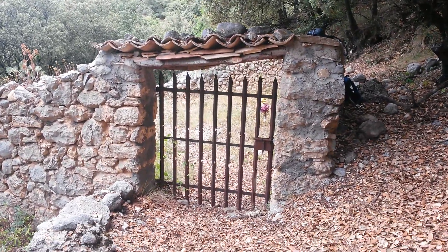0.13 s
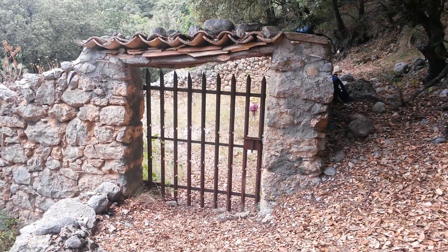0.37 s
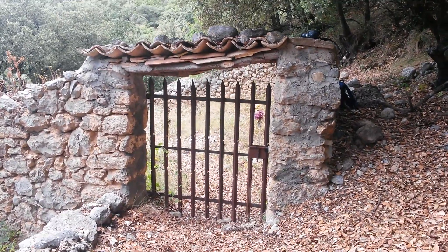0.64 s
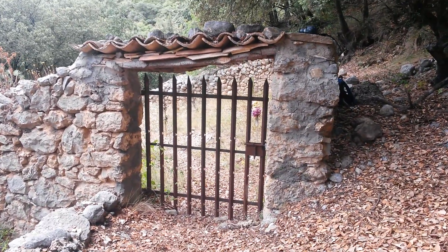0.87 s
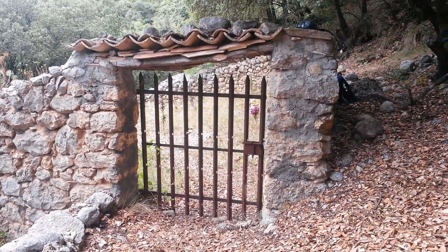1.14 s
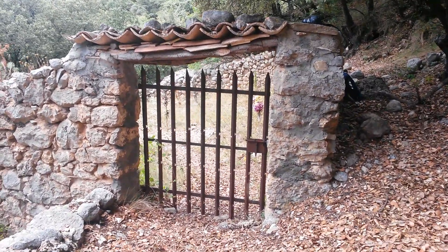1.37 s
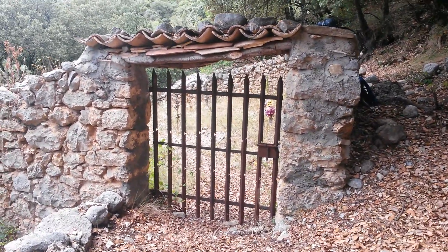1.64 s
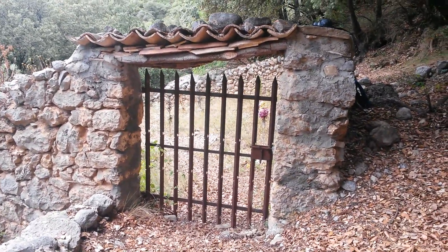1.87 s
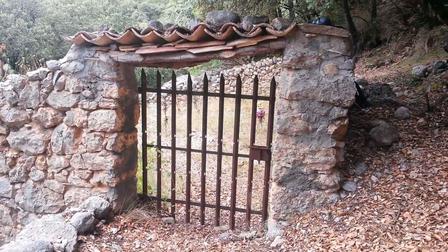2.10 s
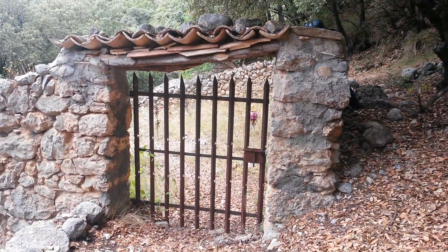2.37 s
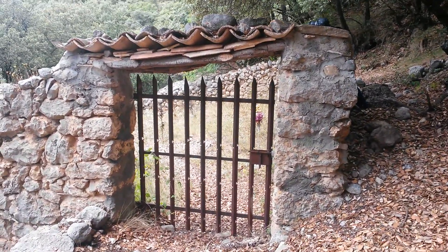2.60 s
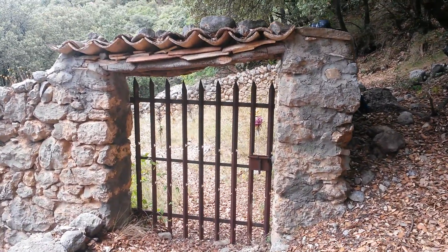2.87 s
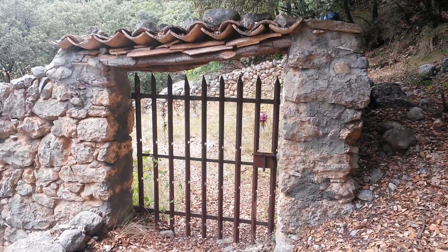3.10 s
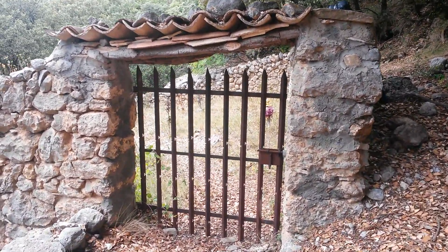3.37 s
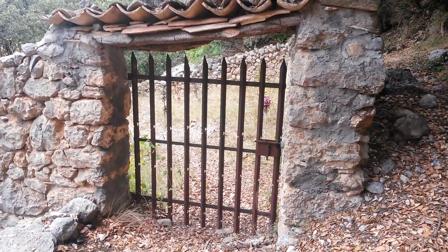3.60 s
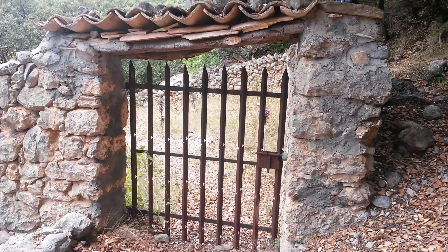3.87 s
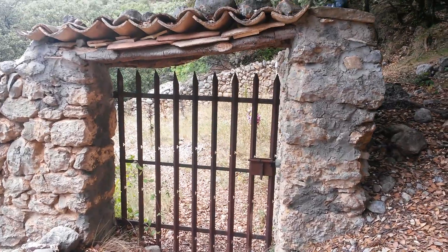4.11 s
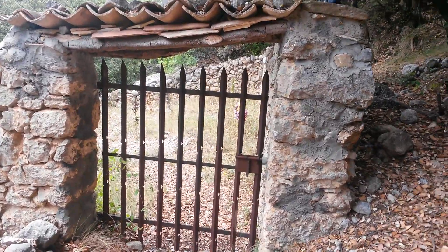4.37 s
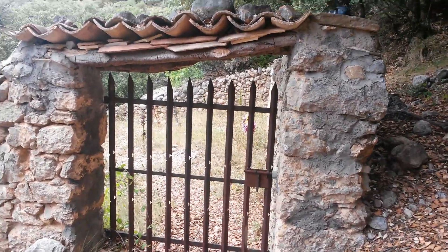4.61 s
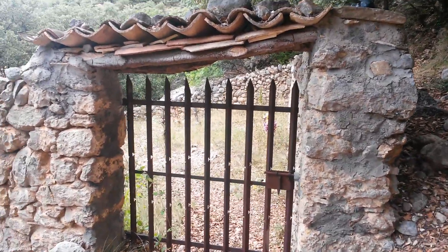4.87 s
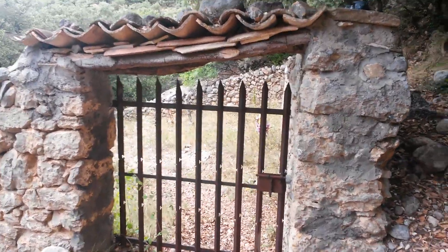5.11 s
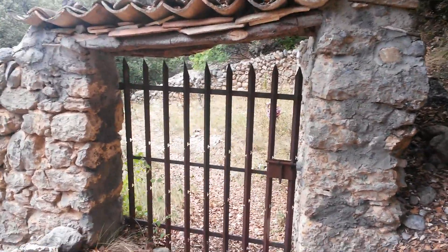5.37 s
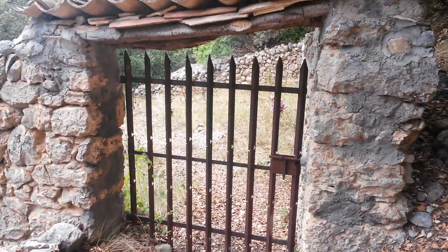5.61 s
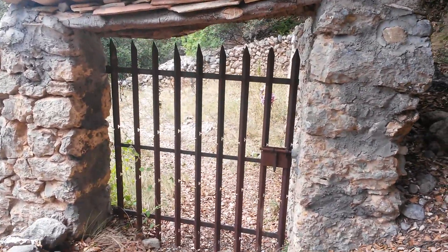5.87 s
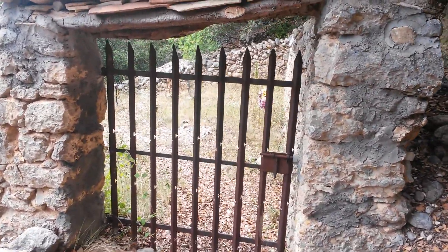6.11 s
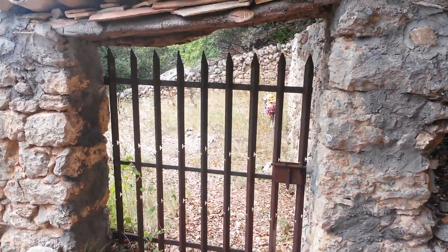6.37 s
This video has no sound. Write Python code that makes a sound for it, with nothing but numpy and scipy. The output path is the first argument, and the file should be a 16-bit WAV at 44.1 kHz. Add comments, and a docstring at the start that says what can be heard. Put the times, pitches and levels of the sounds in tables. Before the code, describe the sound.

Someone wades unhurriedly through brittle fallen leaves, each step a burst of sharp crackling, while the hand-held microphone pops and rumbles softly.

```python
"""Outdoors among trees, slow steps push through deep dry leaves, heard by a hand-held two-port camera.
Leaves snap in thousands of tiny noise ticks, some loud; each port adds its own treble colour.
Twigs and pebbles knock dully under the sole as short swings of a cycle or two.
The gripping hand makes the case pop and rumble, mostly at the left port.
A steady hush of filtered noise lies beneath."""
import sys
import numpy as np
from scipy import signal
from scipy.fft import rfft, irfft, next_fast_len
from scipy.io import wavfile
from scipy.ndimage import uniform_filter1d

SR = 44100
rng = np.random.default_rng(int(sys.argv[2]) if len(sys.argv) > 2 else 0)


def magnitude_from_level(level_db):
    """Linear magnitude for a level in decibels (20 dB per decade)."""
    exponent = np.asarray(level_db, float) / 20
    return 10 ** exponent


def generate_wav(signal):
    """Clip the signal to [-1, 1] and save it as 16-bit WAV at the path in sys.argv[1]."""
    frames = np.transpose(np.atleast_2d(signal))
    scaled = np.clip(frames, -1, 1) * 32767
    pcm = np.round(scaled).astype(np.int16)
    wavfile.write(sys.argv[1], SR, pcm)


N = 285944
T = np.arange(N) / SR

# colour of the quiet outdoor air: pitch_hz, level_db (relative)
HUSH_COLOUR = [(30, -17), (100, -13), (300, 3), (800, -2), (1500, 0.5), (2100, -3), (3000, -4), (4000, -8),
               (7700, 4.5), (10500, -7), (14400, -8), (14900, -33), (15600, -40)]
# level of the low rumble as heard, nearly gone near 4.0 s, before flicker and port levels: time_s, level_db
RUMBLE = [(0.0, -28), (0.05, -40), (0.09, -35.5), (0.16, -34), (0.22, -53), (0.4, -40), (0.75, -34),
          (1.12, -35), (1.6, -42), (2.05, -33), (2.35, -40.5), (2.6, -45), (2.67, -48), (2.95, -44),
          (3.16, -49), (3.3, -40.5), (3.47, -52), (3.6, -45), (3.76, -39), (3.85, -52), (4.0, -88),
          (4.13, -40.5), (4.28, -43), (4.45, -39.5), (5.2, -41), (5.5, -45.5), (5.65, -40), (5.76, -41),
          (5.9, -44), (6.1, -38), (6.25, -39), (6.48, -40)]
# level of the deeper rumble as heard, likewise: time_s, level_db
DEEP_RUMBLE = [(0.0, -42), (0.25, -51), (0.7, -46), (1.15, -35.5), (1.6, -43), (2.05, -40), (2.4, -47),
               (2.9, -44), (3.2, -50), (3.7, -47), (3.98, -80), (4.15, -37.5), (4.6, -39), (5.2, -32),
               (5.6, -41), (5.9, -45), (6.2, -38), (6.48, -43)]
# case slipping under the fingers: time_s, level_db (before filtering), pitch_hz (it swings at 0.79 of this)
CASE_POPS = [(0.038, -33, 360), (0.1319, -34, 323), (0.1428, -29.5, 333), (0.432, -25, 610),
             (0.4653, -26, 430), (0.67, -40, 300), (0.79, -33, 300), (0.89, -25, 300), (0.9693, -29, 219),
             (1.007, -28, 234), (1.103, -24.5, 260), (1.1616, -25.5, 279), (1.204, -28, 234),
             (1.228, -28, 192), (1.2492, -25.5, 240), (1.3946, -32, 304), (1.4668, -31.5, 305),
             (1.6743, -31.5, 325), (1.7912, -30.5, 203), (1.8729, -28, 214), (1.886, -26, 200),
             (2.149, -27, 337), (2.3006, -23, 324), (2.5642, -21, 300), (2.5805, -32, 230),
             (2.6373, -14.5, 154), (3.7594, -21, 880), (3.91, -35, 300), (4.1428, -22.5, 313),
             (4.386, -31, 210), (4.4098, -21, 328), (4.5114, -10, 364), (4.527, -23, 354),
             (4.681, -22.5, 314), (4.8138, -24.5, 507), (4.9273, -27.5, 515), (5.0872, -21.5, 440),
             (5.1393, -23, 415), (5.161, -27, 317), (5.2855, -17.5, 344), (6.0052, -27.5, 296),
             (6.12, -36, 300)]
# twigs and pebbles giving way under the sole: peak_s, level_db (right port), pitch_hz
CLEAR_KNOCKS = [(0.039, -37.5, 694), (0.131, -37, 700), (0.145, -45, 680), (0.4057, -32, 1600),
                (0.6848, -33, 790), (0.7142, -33, 694), (0.7392, -30, 820), (0.8053, -24, 1510),
                (0.9178, -34, 765), (1.0859, -24.5, 760), (1.143, -37, 865), (1.1546, -33, 760),
                (1.343, -31.5, 960), (1.4226, -35, 925), (2.0221, -33, 725), (2.0326, -30.5, 720),
                (2.194, -35, 845), (3.047, -29, 990), (3.139, -27, 1100), (3.162, -25.5, 570),
                (3.17, -31, 900), (3.1762, -29, 940), (3.312, -30, 1020), (3.4082, -29.5, 1100),
                (3.916, -32, 794), (4.006, -36, 1130), (4.4677, -35.5, 730), (4.802, -35, 895),
                (4.964, -32, 960), (5.0516, -33, 820), (5.058, -31, 776), (5.248, -35.5, 730),
                (5.397, -35, 1210), (5.471, -42, 900), (5.568, -43, 630), (5.5955, -33, 820),
                (5.611, -43, 500), (5.702, -31.5, 1330), (5.705, -37, 1120), (5.722, -31, 1070),
                (5.748, -34, 1130), (5.774, -37, 1200), (5.815, -33, 1110), (5.9086, -33.5, 1140),
                (5.9362, -26, 1360), (6.125, -32.5, 980), (6.3421, -24, 1010), (6.3494, -37, 900),
                (6.3567, -31, 724), (6.362, -33, 905), (6.3657, -30, 694), (6.372, -31, 900),
                (6.375, -35, 800), (6.384, -34, 1100), (6.4146, -24, 1260)]
# leaves under the feet, one list a step: time_s, crackle_db
TREAD = [
    [(0.0, -50.5), (0.12, -50.5), (0.2, -54.5), (0.3, -69), (0.37, -50)],
    [(0.39, -42.5), (0.45, -35), (0.54, -43.5), (0.61, -42), (0.65, -37.5), (0.72, -36), (0.83, -44),
     (0.9, -35), (1.0, -40), (1.06, -35.5), (1.12, -37), (1.15, -38), (1.19, -36.5), (1.25, -43),
     (1.3, -37), (1.52, -38), (1.63, -39.5), (1.68, -41), (1.72, -47), (1.78, -46)],
    [(1.83, -51), (1.9, -33), (2.05, -34), (2.14, -33.5), (2.24, -34), (2.29, -39.5), (2.33, -41.5),
     (2.45, -47.5), (2.6, -46.5), (2.84, -47.5), (2.89, -41.5)],
    [(2.92, -37.5), (2.96, -31.5), (3.03, -40), (3.075, -31), (3.095, -30), (3.135, -27), (3.19, -31.5),
     (3.22, -34.5), (3.255, -29.5), (3.34, -30.5), (3.47, -42), (3.58, -53), (3.65, -48.5), (3.72, -54.5)],
    [(3.75, -33.5), (3.77, -26), (3.81, -26), (3.93, -24.5), (4.03, -31), (4.12, -31.5), (4.15, -38),
     (4.175, -44), (4.19, -37), (4.27, -39), (4.36, -46), (4.41, -51.5), (4.47, -40.5), (4.5, -40)],
    [(4.512, -42), (4.53, -30.5), (4.575, -35), (4.61, -32.5), (4.635, -34), (4.7, -35.5), (4.74, -34),
     (4.8, -40.5), (4.84, -31), (4.885, -44.5), (4.9, -42.5), (4.97, -39.5), (5.22, -33), (5.28, -35.5),
     (5.4, -39), (5.52, -47.5)],
    [(5.58, -51.5), (5.67, -43.5), (5.705, -49), (5.735, -36), (5.79, -44), (5.825, -39.5), (5.86, -43),
     (6.0, -40), (6.2, -35), (6.225, -36), (6.24, -41), (6.26, -35), (6.3, -39), (6.37, -31),
     (6.405, -36.5), (6.425, -35.5), (6.48, -33.5)],
]
# one row a step: left_minus_right_db, treble_tilt_db, top_over_treble_db, rustle_db, low_crunch_db
# (the last two hold at a crackle of -40 dB; leaf_bed() varies the others and the rustle)
STEP_TRAITS = [(1.5, -3, 1, -26, -53), (0, 1, 0.5, -20.5, -50), (1, 1.5, 1.5, -19, -50.5),
               (-1, 0.5, -0.5, -19, -53), (1, 4, -1, -20, -57.5), (2, -1, 2, -20.5, -52),
               (2, 0, 3, -19.5, -50.5)]
# slow swelling and thinning of the rustle: time_s, level_db
RUSTLE_SWELL = [(0.0, 2), (0.8, -2.5), (1.2, 0), (1.6, 0.5), (2.3, 0.5), (2.45, 4.5), (2.8, 2), (3.4, -1),
                (3.6, 6), (3.78, -1), (4.1, 2), (4.4, 2.5), (4.52, 0.5), (5.0, 2), (5.35, -0.5), (5.5, 0),
                (5.69, -2), (5.76, -0.5), (6.48, 3.5)]
# loud snaps, before the offsets in loud_snaps():
# peak_s, level_db, body_over_level_db, treble_over_middle_db, left_minus_right_db
LOUD_SNAPS = [(0.1315, -29, -15, -6, 21), (0.185, -33, -27, -15, 6), (0.26, -25, -20, -9.5, 9),
              (0.2833, -40, -22, 3, 0), (0.399, -23, -27, 3, -2), (0.4024, -15, -23, -9, 0),
              (0.4089, -17, -18, -12, 5), (0.4445, -15, -20, -6, 3), (0.45, -23, -21, -13, 9),
              (0.456, -20, -16, -8, 4), (0.4599, -11, -19, -1, 5), (0.4641, -24, -20, 2, 0),
              (0.4902, -7.5, -25, -7.5, 9), (0.515, -23, -27, -10, 7), (0.528, -25, -20, 9, 7),
              (0.579, -20, -25, -5, 6), (0.5889, -19, -26, 0, 6), (0.5923, -24, -28, -9, 10),
              (0.6007, -19, -15, 6, 4), (0.605, -15.5, -23, -12, 6), (0.6095, -21, -20, 10, -4),
              (0.6228, -23, -10.5, 5, 7), (0.6325, -28, -23, 4, -6), (0.653, -42, -16, -13, 0),
              (0.6593, -21.5, -29, -14, 7), (0.667, -18, -23, -10, 4), (0.684, -27, -21, 10, 7),
              (0.6902, -16, -19, 5, 4), (0.6964, -19, -19, 6, 4), (0.719, -20, -15, 6, 4),
              (0.7363, -16, -24, 8, 5), (0.7396, -14.5, -16.5, 0, 12), (0.7483, -15, -14.5, 3, 3),
              (0.7753, -14.5, -21, 1, 1), (0.7927, -17, -19, -2, -1), (0.806, -14.5, -15.5, -9, 10),
              (0.8143, -21, -25, 5, 5), (0.827, -20, -26, 1, 0), (0.855, -26, -31, 10, 7),
              (0.877, -19, -15, 0, 4), (0.8854, -22, -14.5, -8, 3), (0.9057, -18, -14, 1, 7),
              (0.919, -15.5, -20, 6, 1), (0.9243, -26, -25, 5, 8), (0.953, -27, -27, 9, 3),
              (0.9682, -23.5, -27, 11, 3.5), (0.9803, -25, -20, 8, 2), (0.9867, -25, -30, 11, 8),
              (0.9958, -24, -25, 5, 0), (1.0094, -27, -29, -19, 8), (1.0137, -25, -35, -23, 12),
              (1.0335, -25, -33, 8, 4), (1.044, -17, -17, 2, 9), (1.0489, -10.5, -18, 6, -4),
              (1.072, -21, -20, 8, 4), (1.0782, -28, -23, 0, 3), (1.082, -13, -19, 6, 2),
              (1.1416, -26, -28, 5, 8), (1.148, -16, -29, -1, 8), (1.1538, -15.5, -7.5, 5, -9),
              (1.1653, -10, -23, -1, 6), (1.1805, -21, -12, 6, -1), (1.2074, -26, -24, 6, -4),
              (1.212, -26, -12, 1, -3), (1.22, -25, -17, 2, -4), (1.2293, -26, -28, 7, -6),
              (1.2385, -30, -26, 5, -5), (1.2764, -36, -27, 5, -6), (1.294, -28, -18, -1, 0),
              (1.298, -29, -28, -4, 1), (1.31, -35, -23, 1, -2), (1.343, -28, -15, 3, -3),
              (1.3725, -15, -27, 6, -2), (1.3933, -12, -29, -2, 6), (1.4128, -12, -20, -1, 0),
              (1.485, -19, -15, 1, -3), (1.5116, -17, -25, 12, 6), (1.514, -15, -28, -2, -7),
              (1.676, -23, -17, -9, -4), (1.7557, -22.5, -13, -1, 10), (1.7743, -21.5, -24, 8, 4),
              (1.8216, -19.5, -24, -2, 3), (1.8358, -18, -20, 4, 1), (1.8403, -26, -23, -9, -5),
              (1.8564, -12, -18, 0, 1), (1.8804, -29, -31, 7, -9), (1.906, -31, -28, 4, -7),
              (1.917, -15.5, -26, 7, 3), (1.9207, -12, -18, 3, 3), (1.9235, -13, -15, -2, 5),
              (1.9417, -15, -15, 4, 3), (1.9626, -18, -26, 6, -1), (1.966, -14, -18, 1.5, 12),
              (1.974, -16, -15, -3, 2), (1.9881, -19.5, -23, 10, 7), (2.0103, -18, -30, 14, 5),
              (2.019, -24, -23, 6, 1), (2.034, -13, -14, -11, 5), (2.043, -8.5, -17, 1, 5),
              (2.0523, -13, -23, 4, 3), (2.0727, -19, -23, -9, 14), (2.094, -22, -25, 6, -6),
              (2.114, -25, -20, 5, 1), (2.135, -15.5, -32, -13, 1), (2.138, -18.5, -24, 9, 7),
              (2.171, -17, -20, 6, 0), (2.175, -15, -19, 2, 9), (2.212, -16, -12, -1, 6),
              (2.2212, -18, -23, -6, 0), (2.25, -23, -26, 4, 0), (2.28, -20, -20, 5, 4),
              (2.3048, -16, -14, -6, 7), (2.315, -22, -10, -6, 2), (2.3366, -18.5, -10, -7, 1),
              (2.486, -25, -17, -7, 0), (2.6113, -28, -26, 4, 5), (2.7514, -30, -21, -3, -8),
              (2.7713, -28, -27, -1, -5), (2.7985, -28, -18, -5, -5), (2.819, -28, -23, -16, -8),
              (2.837, -26, -17, 0, -10), (2.8423, -28.5, -23, 2, -10), (2.87, -25, -28, -4, -9),
              (2.9188, -23, -26, 5, 1), (2.9255, -18.5, -16, 5, 9), (2.9477, -16, -33, 8, 12),
              (2.9513, -23, -17, -11, 4), (2.956, -19, -30, 8, 3), (2.9618, -9, -38, 10, 3),
              (2.971, -17, -19, 13, 9), (2.9795, -20, -26, 3, 3), (2.99, -13, -31, 16.5, 5),
              (3.0007, -8.5, -22, 5, 12), (3.0092, -22, -31, 6, -1), (3.0228, -13, -23, 1, 5),
              (3.0288, -22, -17, 6, 6), (3.0468, -13, -17, 1, -3), (3.05, -16, -15, -8, 3),
              (3.064, -11, -29, 6.5, 5), (3.0856, -15.5, -8.5, -13, -11), (3.0892, -6.5, -18, -7, 4),
              (3.1065, -12, -35, -11, -4), (3.1224, -16, -25, -4, 10), (3.13, -10, -16, -4, 10),
              (3.1376, -1.5, -20, -2.5, 4), (3.1492, -14, -19, -6, -3), (3.154, -16, -15, 0, 6),
              (3.1612, -8, -12, -8, -5), (3.1782, -3.5, -32, 3, 3), (3.195, -13.5, -13, -1, -2),
              (3.199, -13, -16, 1, -5), (3.2174, -13, -8, -6, -11), (3.2223, 1, -24, -1.5, 6),
              (3.2395, -7.5, -25, 11, 0), (3.2513, -15, -16, 0, 3), (3.2601, -18, -24, 9, -2),
              (3.2652, -27, -20, 0, 1), (3.2702, -9, -21, 7, 2), (3.2821, -17, -15, 6, 2),
              (3.2874, -9, -27, -1, 10), (3.3074, -15, -14, 4, 3), (3.3242, -14, -23, 1, -5),
              (3.3433, -7, -19, -3, 11), (3.3557, -17, -23, 11, -4), (3.3627, -15, -27, 3, 3),
              (3.365, -22, -14, 1, 1), (3.3706, -21, -26, 2, -1), (3.384, -14, -35, 7, 0),
              (3.412, -13.5, -19, 6, 1), (3.4205, -10, -18, 5.5, 8), (3.45, -9.5, -23, 4, 3),
              (3.462, -5.5, -24.5, 2, 7), (3.475, -14, -22, 0, 1), (3.4854, -14, -27, -6, -1),
              (3.515, -13.5, -19, -6, -3), (3.521, -27, -21, 1, 8), (3.537, -30, -22, -17, 8),
              (3.544, -23, -10, 1, 10), (3.561, -28.5, -19, 10, -1), (3.5974, -35, -22.5, -1, 5),
              (3.6054, -21.5, -20, -9, -4), (3.6308, -27, -16, -2, 0), (3.774, -13, -23, 11, 3),
              (3.7993, -16.5, -27, -4, -1), (3.8106, -14, -25, 9, 8), (3.817, -13, -28, 4, 13),
              (3.8222, -11, -18, 5, 5), (3.833, -6, -32, 14.5, -1), (3.837, -22, -24, 8, 6),
              (3.8487, -18, -26, 5, 8), (3.8586, -19, -13, 6, 5), (3.8665, -11.5, -20, -13, 5),
              (3.8858, -7, -18, 1, 6), (3.8918, -8, -18, 0, -4), (3.8968, -11, -14, 1, 12),
              (3.905, -10, -18, 0, 2), (3.918, -11, -29, 5, -3), (3.923, -21, -22, 3, 12),
              (3.9367, -10.5, -34, 14, 5), (3.9406, -17, -22, 4, 5), (3.9502, -13, -28, 10, 12),
              (3.96, -15, -27, 8, 0), (3.963, -24, -21, 5, 6), (3.972, -20, -30, 6, 11),
              (3.9795, -20, -29, 0, 3), (3.99, -14, -28, 14, 4), (4.0063, -12.5, -11, -6, 7),
              (4.0333, -7, -11.5, 3, 6), (4.0408, -13.5, -14.5, 8, 9), (4.047, -9, -21, 6, 4),
              (4.053, -7.5, -20, -12, -2), (4.0615, -15, -7, 3, 3), (4.0734, -17, -17, 0, 7),
              (4.0836, -21, -15, 2, 3), (4.0964, -16, -18, -3, 4), (4.1056, -9.5, -16, 6, 8),
              (4.144, -27, -30, 0, 0), (4.152, -17, -29, 6, 0), (4.182, -11, -26, 6.5, -2),
              (4.198, -16, -29, 2, -6), (4.203, -22.5, -14.5, 14, 6), (4.2344, -25, -26, 7, -9),
              (4.2386, -22, -20, -4, 18), (4.2926, -25.5, -28, 1, -4), (4.3992, -25, -19, 2, -11),
              (4.4645, -24, -21, -3, -1), (4.5076, -9, -13, -6, -4), (4.5094, -18, -7, -4, 18),
              (4.5265, -11.5, -20, -7, -1), (4.5393, -7.5, -34, -6, 1), (4.551, -21, -4, -5, -3),
              (4.5932, -19, -27, -6, -3), (4.611, -15, -32, 4, -2), (4.6176, -22, -30, 1, 2),
              (4.6216, -20, -18, -3, -1), (4.65, -23, -13, -5, -3), (4.725, -23, -26, 3, 0),
              (4.731, -18.5, -38, -1, 15), (4.734, -24, -11, 4, 3), (4.7642, -21.5, -8, 1, -6),
              (4.7806, -22, -20, 3, 0), (4.8017, -27, -19, 3, -4), (4.8159, -10.5, -7, 5.5, -2),
              (4.8365, -26, -22, 3, 0), (4.8406, -22.5, -11, 4, 0), (4.853, -22.5, -17, 5, -1),
              (4.8953, -22.5, -12.5, 5, -2), (4.9, -27, -16, 4, -2), (4.909, -32, -13, 0, 0),
              (4.914, -24, -27, 1, -3), (4.923, -17, -27, 0, 9), (4.927, -21.5, -19, -3, -2),
              (4.964, -19.5, -16, -7, -9), (4.9684, -22, -11, -7, -2), (4.9893, -25, -15, 3, 5),
              (5.0245, -19.5, -15, -10, 11), (5.051, -23.5, -8.5, 6, -6), (5.066, -17, -20, -5, 13),
              (5.081, -16, -13, -5, 5), (5.1153, -21, -17, -8, -3), (5.1194, -32, -23, -5, 2),
              (5.127, -25, -7, 3, -2), (5.1568, -26, -5, -6, -9), (5.166, -20, -31, 2, 15),
              (5.174, -24, -7, 0, -7), (5.1987, -18, -8, -1, -1), (5.2085, -9, -14, -6, 2),
              (5.2482, -19, -22, 7, 3), (5.257, -24, -19, 7, -1), (5.287, -27, -14, 3, -2),
              (5.2934, -20, -11, 3, -3), (5.299, -22, -14, 2, 2), (5.3015, -26, -20, 1, 0),
              (5.3128, -14.5, -13.5, 2, -8), (5.351, -21, -22, -5, -6), (5.3645, -24, -16, -11, 0),
              (5.373, -21, -20, 3, 3), (5.382, -15, -24, 0, 0), (5.396, -19, -16, 5, 10),
              (5.4033, -24, -26, 5, 2), (5.409, -26, -18, -5, 3), (5.4623, -30, -19, -10, -1),
              (5.478, -18, -25, 5.5, 5), (5.4895, -31, -25, 6, 0), (5.575, -30, -26, 7, 2),
              (5.595, -13.5, -21, -2, 6), (5.6133, -28, -29, 7, 3), (5.6247, -24, -16, -4, 1),
              (5.6485, -36, -24, 0, 6), (5.6852, -33, -27, 0, 2), (5.7, -18.5, -14, 1, 8),
              (5.705, -27, -22, 8, 0), (5.7245, -28, -22, 4, 0), (5.7326, -28, -30, 6, -1),
              (5.7388, -24, -24, 5, 1), (5.7472, -17, -20, 2, 7), (5.7856, -24, -24, -5, 7),
              (5.814, -22, -14, -1, 1), (5.8234, -18, -21, -1, 4), (5.8307, -24, -26, -9, -2),
              (5.8613, -21, -30, -10, -1), (5.864, -21, -20, 0, 13), (5.8726, -28, -22, 9, 0),
              (5.878, -17.5, -15, -4.5, 13), (5.91, -13.5, -14, -7, -3), (5.9253, -16, -12, 7.5, 2),
              (5.936, -23, -15, -5, 2), (5.9387, -13, -13.5, -8, 13), (5.9606, -13, -34, -7, 8),
              (6.017, -20.5, -32, -13, 7), (6.0215, -25, -25, -3, 9), (6.056, -27, -26, -1, -1),
              (6.067, -24, -27, 1, 5), (6.069, -24, -8, 3, -6), (6.076, -20, -21, -2, 2),
              (6.0997, -13.5, -19, -9, 11), (6.1244, -15, -25, -3.5, 2), (6.2472, -15, -11, -6, 12),
              (6.2639, -25, -11, -4, 6), (6.267, -24, -17, 2, 9), (6.278, -29, -23, 2, 10),
              (6.3218, -14.5, -12.5, 1.5, 8), (6.356, -19, -22, 7, -2), (6.3713, -25, -23, 8, 3),
              (6.416, -6.5, -23, -2.5, 8), (6.437, -13, -15, -10, 7), (6.4452, -8, -17, -5, 10),
              (6.4573, -13.5, -16, -5, -11), (6.4619, -16, -8, -8, -6), (6.47, -9.5, -20, -7, 15),
              (6.4778, -18, -19, 5, 2)]
# colour of each microphone port: pitch_hz, level_db
LEFT_PORT = [(150, -34), (400, 5), (1000, -5.5), (1700, -7.5), (2200, -10), (2700, -1), (3500, -2),
             (5000, -3.5), (6200, -7), (7200, 6.5), (7850, 8), (8800, -6.5), (10500, -0.5), (12000, -13),
             (14400, -17), (14900, -40), (15600, -60)]
RIGHT_PORT = [(150, -18), (400, -12), (700, 0), (1700, -15.5), (2500, -9), (3150, -33.5), (3700, -5.5),
              (5000, -2.5), (6000, 2), (7000, -4.5), (7800, -8), (8700, -1), (9700, -3), (11500, -10),
              (14400, -19.5), (14900, -35), (15600, -50)]
# treble ring of the ports, which changes with the direction of the leaves: time_s, left_db, right_db
PORT_RING = [(0.0, 2.5, 0), (0.4, 5.5, 10), (0.85, 5, 5), (1.15, 4.5, 6), (1.3, -11, 7), (1.65, -1.5, 12),
             (1.85, -1.5, 3.5), (2.3, -1.5, 4), (2.65, -3.5, 11), (2.85, -2, -1), (3.1, 4, 8),
             (3.6, 0.5, 0), (4.1, 1.5, 5), (4.35, -4, -1), (4.6, -6, 12.5), (4.9, -6, 9), (5.35, -2.5, 8.5),
             (5.9, -1, 10.5), (6.1, -7, 4), (6.48, -0.5, 7)]

LEFT_LAG_S = 0.00014  # leaves and knocks reach the left port this much later
BURST = 160  # samples in one snap
# edges of the five bands of a snap
RUSTLE_HZ, BODY_HZ, MIDDLE_HZ, BRIGHT_HZ, AIR_HZ = 1400, 3400, 6000, 8000, 10300


def level(x, db):
    """Scale to an rms level."""
    return x * magnitude_from_level(db) / np.sqrt(np.mean(x ** 2))


def band(x, lo_hz, hi_hz):
    """Gentle band-pass."""
    return signal.sosfilt(signal.butter(2, [lo_hz, hi_hz], "band", fs=SR, output="sos"), x)


def colour(x, points):
    """Filter through pitch_hz, level_db points, adding no delay."""
    hz, db = np.transpose(points)
    size = next_fast_len(N)
    grid = np.maximum(np.arange(size // 2 + 1) * SR / size, 1)
    gain = magnitude_from_level(np.interp(np.log(grid), np.log(hz), db))
    return irfft(rfft(x, size) * gain, size)[:N]


def walk(rate):
    """Random levels, each held 1 / rate seconds, smoothed twice."""
    k = int(SR / rate)
    held = np.repeat(rng.standard_normal(N // k + 1), k)
    return uniform_filter1d(uniform_filter1d(held, k), k)[:N]


def place(s, shapes):
    """Add up short shapes, one per row, at their times."""
    at = np.round(s * SR).astype(int)[:, None] + np.arange(shapes.shape[1])
    return np.bincount(np.clip(at, 0, N).ravel(), shapes.ravel(), N + 1)[:N]


def tread(when):
    """Crackle level and the current step's traits at given times."""
    starts = [rows[0][0] for rows in TREAD]
    step = np.searchsorted(starts, when, "right") - 1
    return np.interp(when, *np.concatenate(TREAD).T), *np.array(STEP_TRAITS)[step].T


def follow(db, base_db, slope):
    """A level that rises and falls with a leading level, equal to base_db when that is -40 dB."""
    return base_db + slope * (db + 40)


def hush():
    """Steady air among trees: coloured noise, only partly shared by the two ports."""
    common = 1.2 * rng.standard_normal(N)
    ports = [colour(common + rng.standard_normal(N), HUSH_COLOUR) for _ in range(2)]
    return level(np.array(ports), -55)


def case_pops(rumble_db):
    """The case bends under a finger, lets go and swings back in a quickly dying wave."""
    chance = rng.uniform(size=(60, 3))
    when = chance[:, 0] * N / SR
    faint_db = np.interp(when, T, rumble_db) - 1.5 + 8 * chance[:, 1]
    faint = np.transpose([when, faint_db, 190 * np.exp(1.03 * chance[:, 2])])
    s, db, hz = (c[:, None] for c in np.concatenate([CASE_POPS, faint]).T)
    lead_s = 0.004
    t = np.arange(int(0.03 * SR)) / SR - lead_s
    # higher pops bend first and swing longer; lower ones just give way
    soft_hz, sharp_hz = 170, 300
    sharp = np.clip((hz - soft_hz) / (sharp_hz - soft_hz), 0, 1)
    bend = -0.75 * sharp * np.exp(np.minimum(t, 0) / 0.00038)
    fade = np.exp(-(2.5 - 1.05 * sharp) * hz * np.maximum(t, 0))
    swing = fade * np.cos(2 * np.pi * 0.79 * hz * t - 0.6)
    direction = np.sign(rng.standard_normal(s.shape))
    shapes = direction * magnitude_from_level(db) * np.where(t < 0, bend, swing)
    pops = place(s[:, 0] - lead_s - 0.0006, shapes)
    return band(pops, 38, 1900) * magnitude_from_level(np.array([[0], [-26]]))  # left, right


def skin_rumble(rumble_db):
    """Skin rubs on the case: flickering low noise in two bands, stronger at the left port."""
    deep_db = np.interp(T, *np.transpose(DEEP_RUMBLE))
    sway_db = 1.85 * walk(7.7)  # shared by both ports
    ports = []
    for port_db in (3, -5):
        flicker_db = 6.5 * walk(30)
        rub = rng.standard_normal(N) * magnitude_from_level(flicker_db + sway_db + port_db)
        ports.append(band(rub, 110, 326) * magnitude_from_level(rumble_db) + band(rub, 50, 157) * magnitude_from_level(deep_db))
    return np.array(ports)


def grip():
    """The gripping hand makes the case pop, and its skin rumbles on it."""
    rumble_db = np.interp(T, *np.transpose(RUMBLE))
    return case_pops(rumble_db) + skin_rumble(rumble_db)


def knock(s, db, hz, length_s, pan_db, direction):
    """A dull knock of a cycle or two, nearly the same at both ports."""
    t = np.arange(-200, 200) / SR
    fade = np.exp(-(t / length_s[:, None]) ** 2)
    shape = direction[:, None] * fade * np.cos(2 * np.pi * hz[:, None] * t)
    left = place(s + t[0] + LEFT_LAG_S, magnitude_from_level(db + pan_db)[:, None] * shape)
    right = place(s + t[0], magnitude_from_level(db)[:, None] * shape)
    return np.array([left, right])


def twigs():
    """Many faint knocks under the sole follow the crackle; clear ones come at set times."""
    count = int(500 * N / SR)  # 500 faint knocks a second
    when, size = rng.uniform(0, N / SR, count), rng.exponential(1, count)
    chance = rng.standard_normal((count, 3))
    crackle_db, *_, crunch_db = tread(when)
    crunch_db = follow(crackle_db, crunch_db, 1)
    faint_db = crunch_db + np.minimum(1.7 * size, 16) + 2 * chance[:, 0]
    hz = 1050 * np.exp(0.5 * chance[:, 0])
    pan_db = 0.19 + 1.56 * chance[:, 1]
    faint = knock(when, faint_db, hz, 0.73 / hz, pan_db, np.sign(chance[:, 2]))
    s, db, hz = np.transpose(CLEAR_KNOCKS)
    return faint + knock(s, db, hz, 0.7 / hz, 2.5, -np.ones(len(s)))


def blur(x):
    """Add a faint, brief blur of noise before and after each tick."""
    keep = np.exp(-1 / (0.0028 * SR))  # the blur's energy dies over 2.8 ms
    energy = signal.filtfilt([1 - keep], [1, -keep], x ** 2)
    return x + magnitude_from_level(-13) * np.sqrt(np.abs(energy)) * rng.standard_normal(N)


def snap(s, db, body_db, bright_db, air_db, pan_db, tear_s, tear_spread, tear, alike, scatter_s, lead):
    """A leaf tears up to a tick and tears on after it; the left port hears it a little later."""
    t = (np.arange(BURST) - BURST // 2) / SR
    chance = rng.standard_normal((len(s), 2 * BURST + 2))
    length_s = tear_s * np.exp(tear_spread * chance[:, -1:])
    fade = tear * np.exp(-np.abs(t) / length_s) * np.where(t < 0, lead, 1)
    shared, own = chance[:, :BURST], chance[:, BURST:-2]
    right_noise = alike * shared + np.sqrt(1 - alike ** 2) * own
    left_s = s + LEFT_LAG_S + scatter_s * chance[:, -2]
    edges = ((RUSTLE_HZ, BODY_HZ), (BODY_HZ, MIDDLE_HZ), (MIDDLE_HZ, BRIGHT_HZ),
             (BRIGHT_HZ, AIR_HZ), (AIR_HZ, 20000))
    hz = np.arange(BURST // 2 + 1) * SR / BURST
    ports = []
    for side, noise, heard_s, port in ((1, shared, left_s, LEFT_PORT), (-1, right_noise, s, RIGHT_PORT)):
        burst = fade * noise + (t == 0) * np.sign(shared)
        power = np.abs(rfft(burst)) ** 2
        # a snap's size in each band counts mostly where the port rings
        ring = magnitude_from_level(2 * np.interp(hz, *np.transpose(port)))
        middle_db = db - bright_db / 2 + side * pan_db / 2
        # the band between body and middle leans towards the body
        lean_db = middle_db + 0.35 * (body_db - middle_db)
        treble_db = middle_db + bright_db
        gains_db = (body_db, lean_db, middle_db, treble_db, treble_db + air_db)
        total = 0
        for gain_db, (lo, hi) in zip(gains_db, edges):
            weight = ring * (hz >= lo) * (hz < hi)
            size = np.sqrt(power @ weight / weight.sum())
            layer = place(heard_s + t[0], (magnitude_from_level(gain_db) / size)[:, None] * burst)
            total = total + band(blur(layer), lo, hi)
        ports.append(total)
    return np.array(ports)


def leaf_bed():
    """A dense bed of small leaf snaps follows the tread."""
    count = int(1000 * N / SR)  # 1000 small snaps a second
    when, size = rng.uniform(0, N / SR, count), rng.exponential(1, count)
    tilt = rng.standard_normal((count, 4))
    crackle_db, pan_db, bright_db, air_db, rustle_db, _ = tread(when)
    # leaves give way in clusters, so the bed swells and sags quickly
    surge_db = np.interp(when, T, 1.5 * walk(40) + 0.56 * walk(160))
    size_db = np.minimum(3.04 * size, 9.5) + surge_db
    swell_db = np.interp(when, *np.transpose(RUSTLE_SWELL))
    body_db = follow(crackle_db, rustle_db, 0.89) + swell_db + size_db + 2.1 * tilt[:, 0]
    bright_db = bright_db + np.interp(when, T, 1.8 * walk(11)) + 1.4 * tilt[:, 1]
    air_db = air_db + np.interp(when, T, 1.8 * walk(17)) + 2.26 * tilt[:, 3]
    return snap(when, crackle_db + size_db + 21, body_db, bright_db, air_db, pan_db + 6.4 * tilt[:, 2],
                tear_s=0.002, tear_spread=0.95, tear=0.22, alike=0.66, scatter_s=0.000035, lead=0.96)


def loud_snaps():
    """Single leaves break loudly, each at its own time with its own tone."""
    s, db, body_db, treble_db, pan_db = np.transpose(LOUD_SNAPS)
    db = db + 17  # makes up for the loss in the ports, as do the next two offsets
    body_db = db + body_db + 15.5
    treble_db = treble_db + 4
    air_db = tread(s)[3] - 2.5 + 4 * rng.standard_normal(len(s))
    return snap(s, db, body_db, treble_db, air_db, pan_db - 5.5,
                tear_s=0.00065, tear_spread=0.32, tear=0.34, alike=0.69, scatter_s=0.000012, lead=0.48)


def ringing(x, ring_db):
    """Raise or lower a port's treble ring as time goes."""
    sos = signal.butter(1, (7640, 8060), "band", fs=SR, output="sos")
    return x + (magnitude_from_level(ring_db) - 1) * signal.sosfiltfilt(sos, x)


def leaves():
    """Small and loud snaps pass through the two ports, each with its own colour and changing ring."""
    s, *ring_db = np.transpose(PORT_RING)
    ports = []
    for x, port, db in zip(leaf_bed() + loud_snaps(), (LEFT_PORT, RIGHT_PORT), ring_db):
        ports.append(ringing(colour(x, port), np.interp(T, s, db)))
    return np.array(ports)


def scene():
    """Air, hand, twigs and leaves together."""
    return hush() + grip() + twigs() + leaves()


def roll_off(x):
    """The treble ends steeply here."""
    return signal.sosfilt(signal.butter(12, 15790, fs=SR, output="sos"), x)


def record(dry):
    """The camera rounds the highest peaks and cuts the top of the treble."""
    ceiling = 0.8
    rounded = ceiling * np.tanh(dry / ceiling)
    top_cut = signal.ellip(8, 0.2, 70, 15600, fs=SR, output="sos")
    finished = signal.sosfilt(top_cut, rounded)
    return roll_off(finished)


dry = scene()
out = record(dry)
generate_wav(out)
```